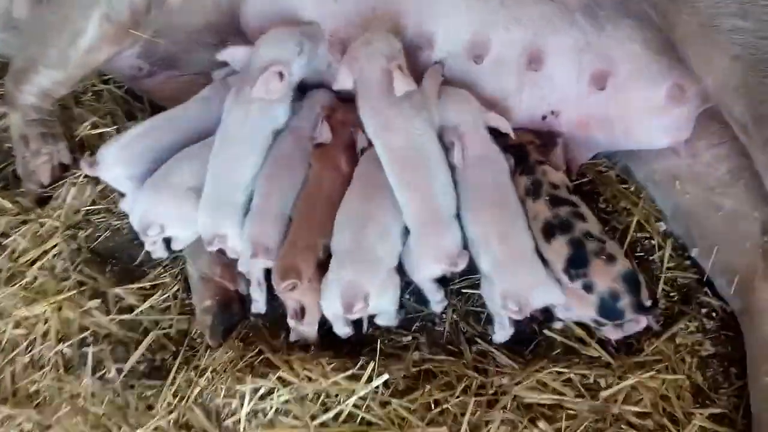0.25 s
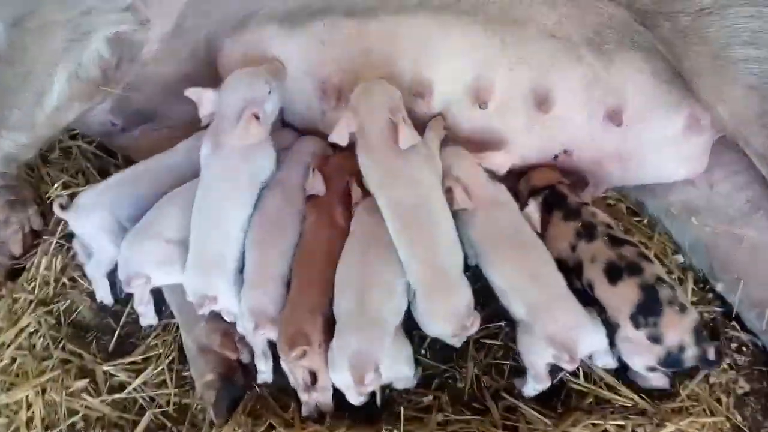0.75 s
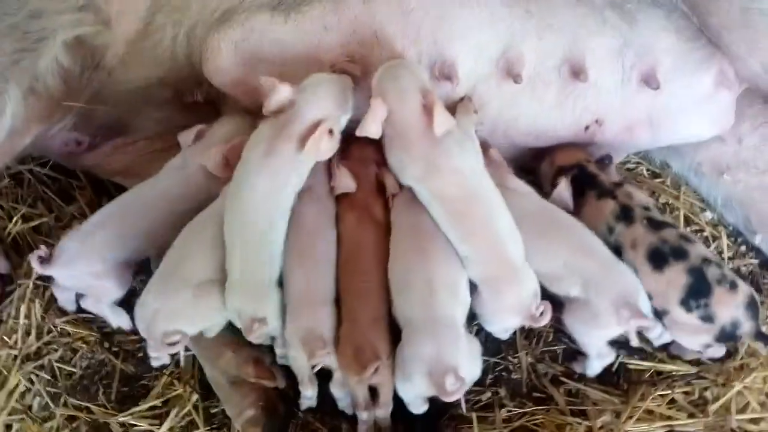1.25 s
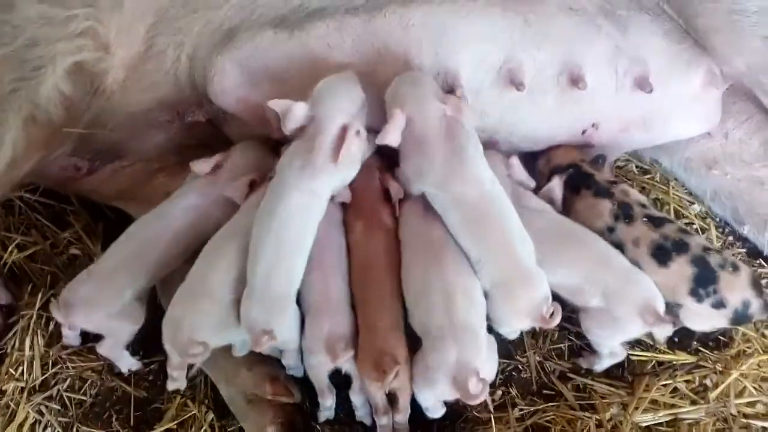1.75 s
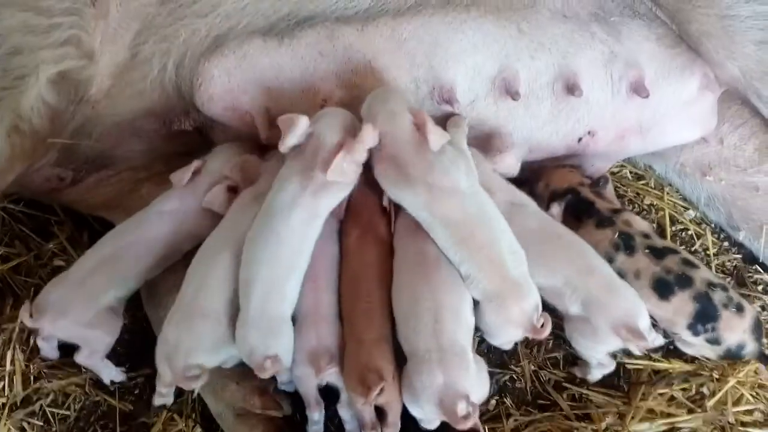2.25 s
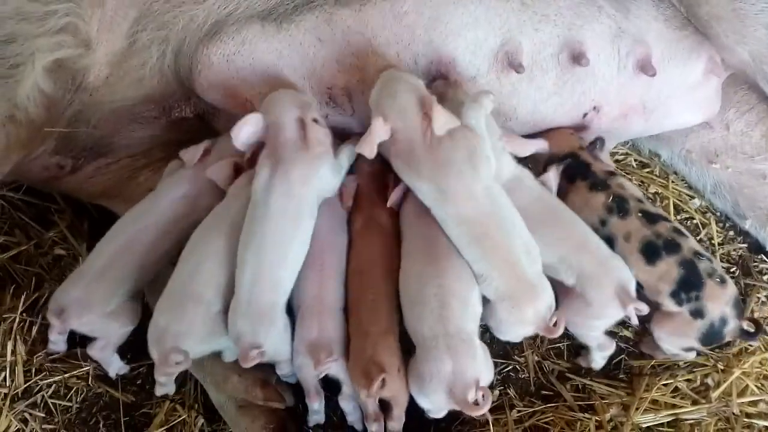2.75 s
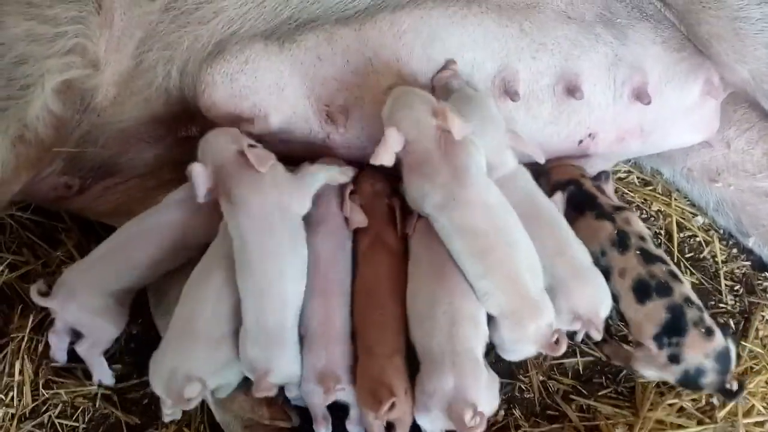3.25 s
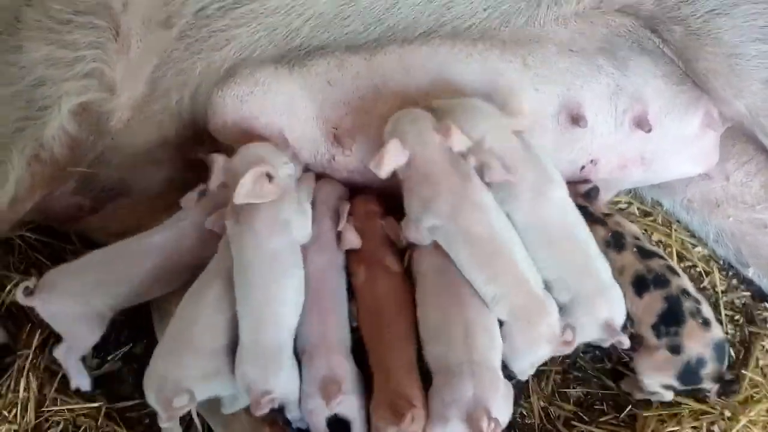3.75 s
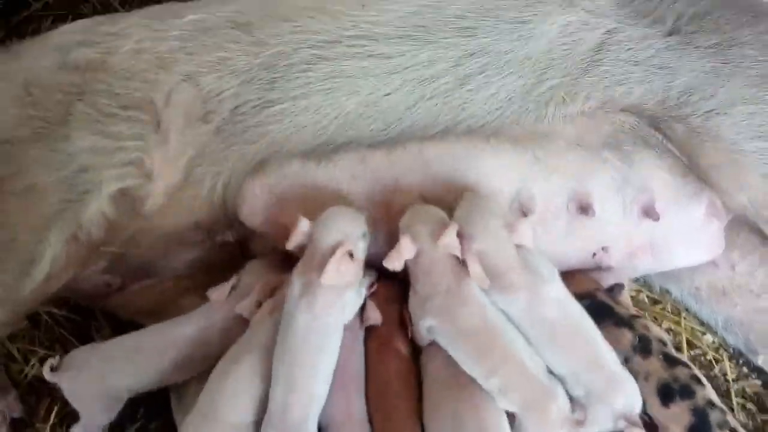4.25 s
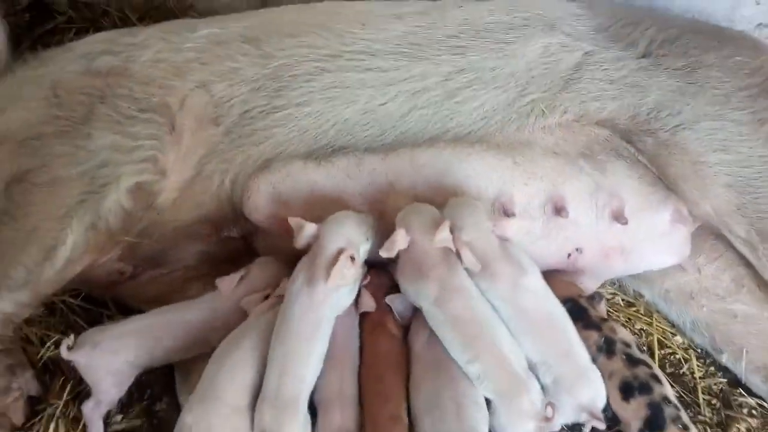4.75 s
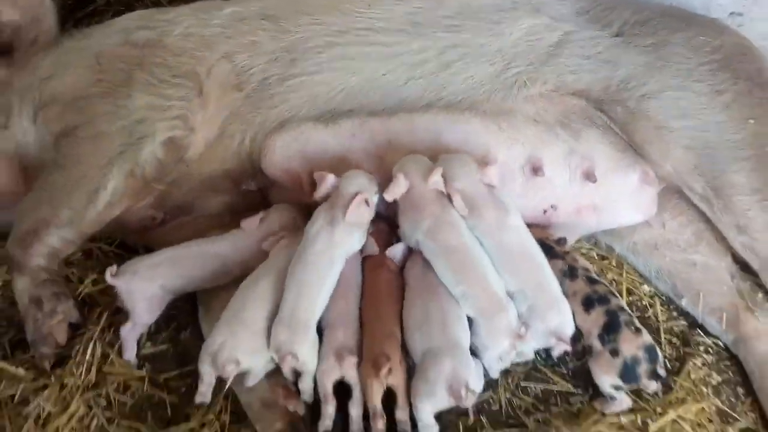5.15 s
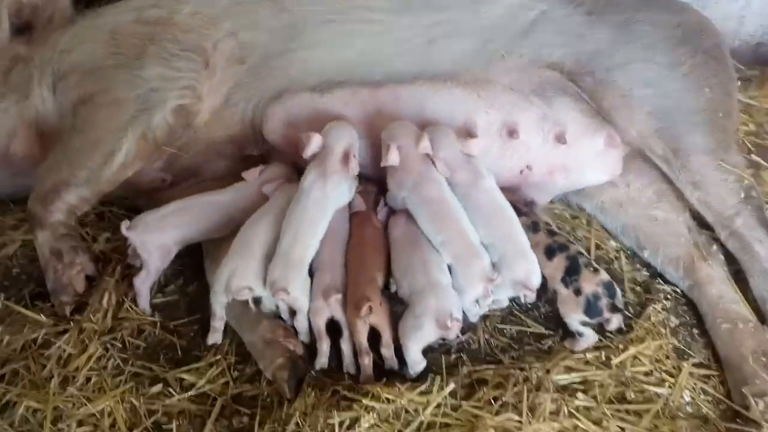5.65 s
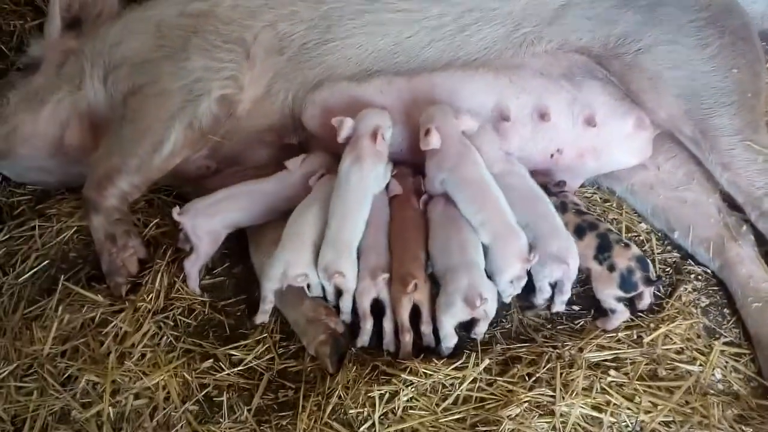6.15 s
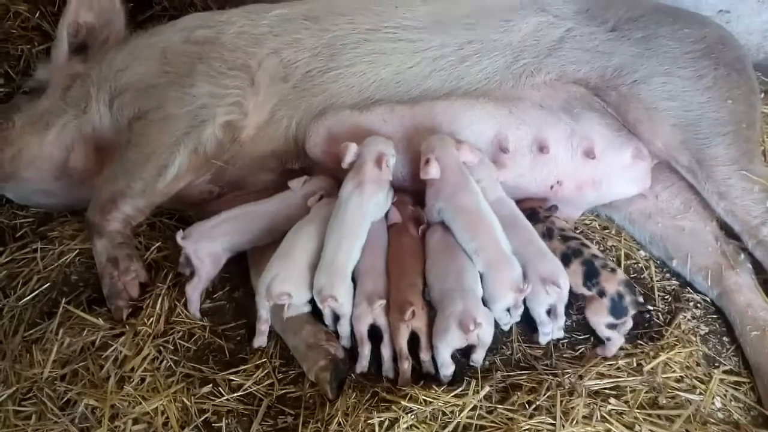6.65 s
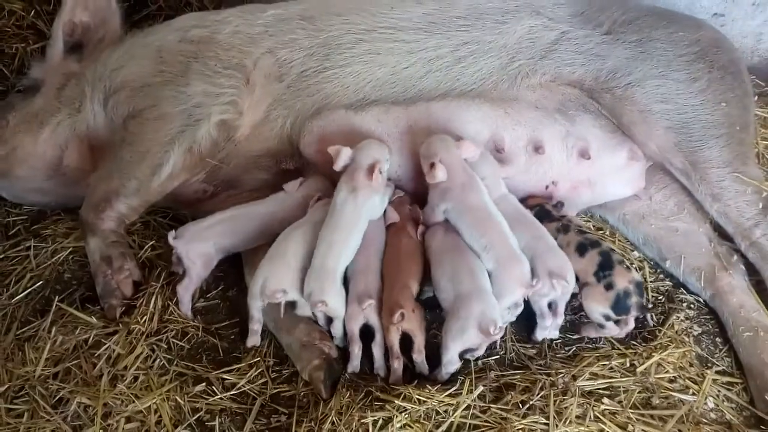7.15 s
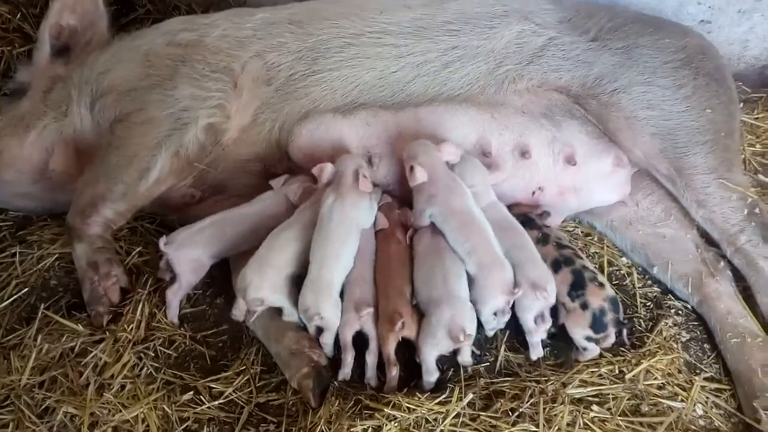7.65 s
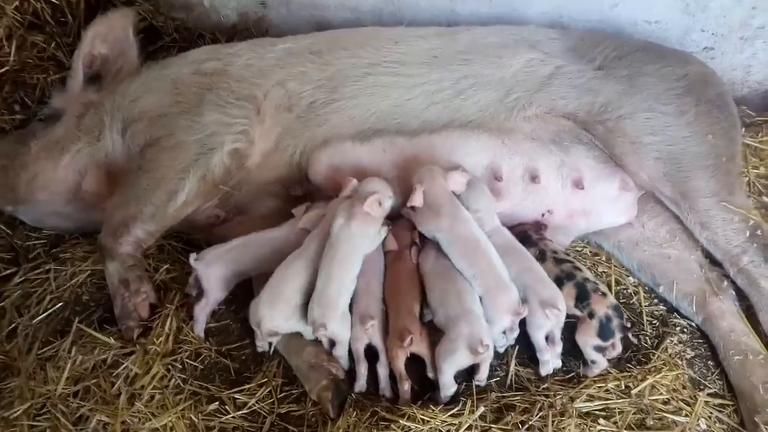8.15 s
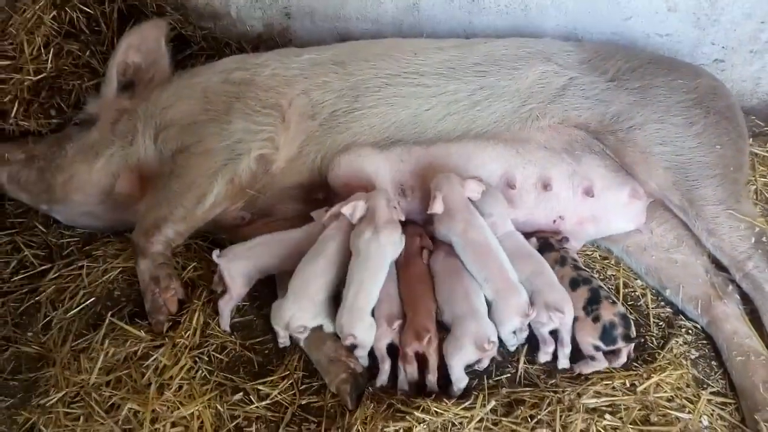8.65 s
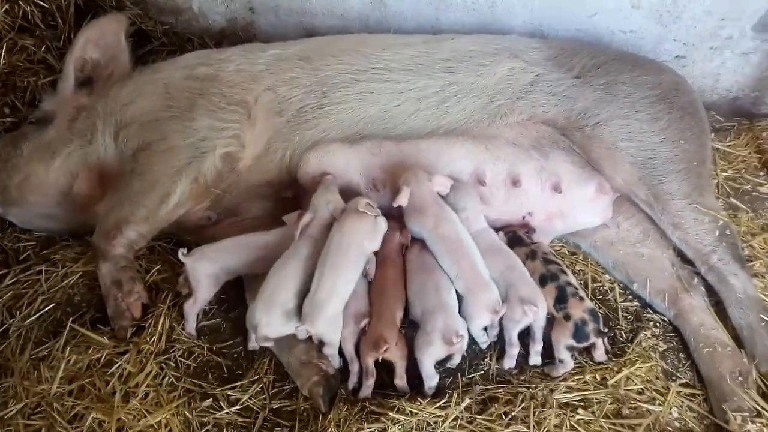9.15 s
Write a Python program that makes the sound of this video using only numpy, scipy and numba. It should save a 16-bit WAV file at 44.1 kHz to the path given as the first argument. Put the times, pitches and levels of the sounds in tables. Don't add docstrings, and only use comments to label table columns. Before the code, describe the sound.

Beside a sow nursing in straw, a close handheld microphone picks up deep, rattling, nasal grunts, each beginning as a dull murmur and opening brighter. They come irregularly at first, pause briefly, then settle into an even rhythm to the end. Between them are muffled gulps, tiny wet clicks, breathy piglet snuffles, little snorts and dry straw rustle, with a short hard room ring and low boom.

```python
import sys
import numpy as np
from scipy import signal
from scipy.fft import rfft, irfft, next_fast_len
from scipy.io import wavfile
from scipy.ndimage import uniform_filter1d
from numba import njit

SR = 44100
rng = np.random.default_rng(int(sys.argv[2]) if len(sys.argv) > 2 else 0)


def elevation(decibels):
    levels = np.asarray(decibels, float)
    return 10 ** (levels / 20)


def materialize(psi):
    bounded = np.clip(np.atleast_2d(psi).T, -1, 1)
    quanta = np.round(bounded * 32767).astype(np.int16)
    wavfile.write(sys.argv[1], SR, quanta)


N = 414128

# (time [s], pitch [Hz], level [dB], overtone level [dB])
WHINE = [
    (0.0, 2570, -47.5, -48.5),
    (0.027, 2603, -50, -59.5),
    (0.31, 2770, -77, -83),
    (0.34, 2610, -75, -92),
]
# (peak time [s], fade
# [s], snuffle level [dB], straw level [dB])
SWELLS = [(0.13, 0.16, -50.5, -70), (0.48, 0.22, -62, -78), (0.65, 0.35, -64, -98),
          (1.072, .15, -47, -58), (1.332, 0.17, -51, -84), (1.96, 0.12, -56.5, -91),
          (2.27, 0.19, -58, -76), (2.722, 0.19, -48.5, -69), (3.062, 0.13, -52, -81),
          (3.882, 0.13, -42, -74), (4.08, 0.11, -56, -71.5), (4.45, 0.27, -55, -77),
          (4.918, 0.14, -42.5, -60.5), (5.181, 0.053, -58, -62.5), (5.309, 0.12, -47.5, -111),
          (5.582, 0.09, -59, -75.5), (5.78, 0.064, -52.5, -94), (6.01, 0.098, -59, -72),
          (6.23, 0.076, -49, -69.5), (6.489, 0.072, -59.5, -71), (7.109, 0.09, -74, -96),
          (7.56, 0.16, -52.5, -97), (8.1, 0.088, -49, -108.5), (8.6, 0.13, -47, -78),
          (9.08, 0.15, -47, -87)]
# (time [s], fade [s], snuffle level [dB], straw level [dB])
JERKS = [
    (0.854, 0.062, -54, -91),
    (0.995, 0.048, -81, -96),
    (1.545, 0.33, -44, -67.5),
    (2.52, 0.035, -52, -90),
    (3.424, .2, -42.5, -57),
    (7.318, 0.12, -59.5, -63.5),
    (7.733, 0.11, -51.5, -77),
    (8.88, 0.22, -52.5, -62),
    (9.3, 0.12, -56.5, -89.5),
]
# (frequency [Hz], level per Hz [dB])
SNUFFLE_COLOUR = [(1470, 5.5), (2500, -2.5), (3250, 1.5), (4370, 7), (4810, 2), (5070, 7), (6700, 0),
                  (9000, -19.5), (11700, -44), (19800, -120)]
# (frequency [Hz], level per Hz [dB])
STRAW_COLOUR = [(4120, -29.5), (7000, -4.5), (10100, -9), (11100, -13.5), (13700, -23), (14900, -14.5),
                (15600, -33)]
STIR_DB, SWELL_SHARE, JERK_S = 25.5, 0.9, 0.016
CALM_SNUFFLE_DB, CALM_STRAW_DB = -70, -92

# (break time [s], loudest flap time [s], effort [dB], snout level [dB], mouth level [dB])
GRUNTS = [(0.054, 0.089, -26, -36, -31.5), (0.5835, 0.6496, -27, -27, -29), (2.667, 2.739, -29, -43, -29),
          (3.317, 3.396, -22.5, -32, -27), (3.803, 3.875, -25.5, -40.5, -29.5),
          (4.274, 4.347, -27, -34.5, -27), (4.749, 4.827, -26.5, -34, -31.5),
          (5.2304, 5.3075, -26.5, -34.5, -31.5), (5.646, 5.753, -26.5, -29.5, -33),
          (6.155, 6.196, -24, -32, -36), (6.545, 6.614, -27.5, -28, -35.5), (7.055, 7.09, -23, -28.5, -34),
          (7.513, 7.546, -22.5, -35.5, -36), (7.9807, 8.0591, -24, -39, -26), (8.479, 8.516, -24, -34, -38),
          (8.93, 9.005, -24.5, -33.5, -35)]
# (first flap time [s], loudest flap time [s], hold [s], effort [dB], mouth level [dB])
RESTLESS = [
    (1.124, 1.199, 0.012, -24.5, -29),
    (1.291, 1.3704, 0.24, -35.5, -25),
    (1.788, 1.867, 0.024, -29.5, -28.5),
    (2.038, 2.115, 0.012, -30, -29.5),
]
# (time [s], throat start [Hz], tongue with mouth shut [Hz], with mouth open [Hz], sinus [dB])
POSTURE = [(0.1, 890, 1270, 1425, -6), (0.599, 890, 1300, 1310, -25), (1.2, 884, 1400, 1735, -5),
           (1.4, 846, 1400, 1740, -23), (2.1, 872, 1430, 1660, -23), (2.701, 890, 1490, 1680, -1.5),
           (3.4, 850, 1366, 1545, -2.5), (4.3, 855, 1390, 1390, -7), (5.299, 792, 1340, 1660, -3),
           (6.2, 800, 1320, 1566, -6), (6.6, 807, 1200, 1500, -10), (7.3, 744, 1180, 1410, -12),
           (8.05, 815, 1226, 1600, -4), (9.0, 752, 1220, 1390, -4)]
# (frequency [Hz], width [Hz], level [dB])
CHEST = [(203, 57.5, -0.5), (396, 100, -3.5), (469.8, 58.4, 0.5), (850, 84, -16)]
# (frequency [Hz], width [Hz], level [dB])
SNOUT = [(2400, 274, 1), (6070, 290, 0)]
# (frequency [Hz], width [Hz], level [dB])
MOUTH = [(2710, 170, 0.5), (3465, 530, 1.5), (4150, 190, -4), (5780, 140, -12.5)]
# (frequency [Hz], width [Hz], level [dB])
SINUS = [(4486, 245, 6.5)]
FLAP_S = .037
MURMUR_FLAPS = 3
MURMUR_DB, MURMUR_DULL_DB, RESTLESS_FIRST_DB = 19, 13.5, 7.5
MURMUR_END_DB, BREAK_DB_PER_S = 1.5, 73.5
MURMUR_THROAT_DB, MURMUR_PITCH = 3, .7
RELEASE_S, RELEASE_DB, CLOSE_S = .1, 27, 0.028
THROAT_DB, THROAT_FIRST_DB, THROAT_END_DB = -10, -13.5, -11.5
SNOUT_FIRST_DB, SNOUT_END_DB, RESTLESS_SNOUT_DB = -1, -1.5, -40.5
MOUTH_SHUT_DB, MOUTH_END_DB, RESTLESS_TONGUE_DB = -10.5, -1.5, -2
JAW_LEAD_S, TONGUE_START = 0.0032, 0.893
REST_HZ = 891.8

# (frequency [Hz], width [Hz], level [dB])
BOOM = [(68.2, 5.3, 7.5), (116.87, 3.52, -2)]
# (time [s], first mode [dB], second mode [dB])
PLACE = [(0, 7, 15), (2, 3, 6), (4, 4, 13.5), (5.5, 3.5, 8), (6.5, -5, 6.5), (8, 1, 13.5), (9.4, -8, 9.5)]
# (frequency [Hz], width [Hz], level [dB])
PEN = [(226, 50, -1.5), (234.7, 8.9, 15.5), (312, 3.4, -36), (478, 2.6, -14.5), (908, 6.3, -7)]
# (frequency [Hz], time to fall 60 dB [s])
WALLS = [(60, 1), (250, 0.43), (700, 0.47), (1500, 0.36), (4000, 0.35), (8000, 0.059)]
# (frequency [Hz], left-right likeness [-1 to 1])
ALIKE = [(60, .97), (130, .995), (290, .95), (640, .65), (1100, -.2), (2000, 0), (15000, 0)]
LAG = 16
LAG_FROM_HZ = 830

# (time [s], peak level [dB])
GULPS = [(0.471, -39.5), (1.039, -40.5), (2.551, -40), (3.219, -40.5), (3.705, -38), (4.175, -39.5),
         (4.656, -41), (5.114, -39.5), (5.56, -40.5), (5.939, -39.5), (6.438, -36.5), (6.925, -37),
         (7.355, -38), (7.884, -38.5), (8.333, -39), (8.849, -37), (9.326, -35)]
# (time [s], peak level [dB], pitch [Hz])
SMACKS = [
    (0.847, -52, 4280),
    (2.5164, -63, 4400),
    (3.0095, -53, 1630),
    (4.0154, -58, 1290),
    (4.696, -61, 2920),
    (5.0792, -54.5, 1190),
    (7.314, -62.5, 3800),
    (7.7285, -53.5, 1340),
]
# (time [s], level [dB], length [s], brightness [dB])
SNORTS = [
    (1.007, -55.5, 0.02, 3.5),
    (7.799, -62, 0.15, 0.5),
    (2.999, -44.5, 0.11, -3),
    (5.511, -49, 0.057, -13),
    (5.93, -46.5, 0.086, -12),
    (6.825, -53, 0.052, -36),
]
# (frequency [Hz], width [Hz], level [dB])
PIGLET = [(583, 370, 1.5), (890, 630, -10)]
# (frequency [Hz], width [Hz], level [dB])
NOSTRIL = [(997, 130, -0.5), (1480, 350, -1), (1780, 290, -2.5)]
# (time [s], level [dB], length [s])
NOSE = [
    (9.315, -66, 0.038),
    (6.922, -79, 0.16),
    (7.947, -68.5, 0.019),
    (8.842, -68.5, 0.11),
]

# (frequency [Hz], level per Hz [dB])
AIR = [(48, -26), (66, 0), (120, 4), (250, 6.5), (600, -6.5), (1000, -9.5), (1400, -8.5), (1900, -14.5),
       (3000, -19.5), (5000, -21), (6800, -31), (8000, -38.5), (15600, -53)]
AIR_DB = -53.5
LULL_S, LULL_WIDTH_S, LULL_DB = 2.597, 0.27, -14.5
# (frequency [Hz], level per Hz [dB])
HANDS = [(26, -4), (36, -2.5), (46, -24.5), (80, -69)]
# (frequency [Hz], left minus right [dB])
TILT = [(60, -3.5), (110, -3.5), (200, -1), (380, -3.5), (700, -1.5), (1290, -3), (2380, -6.5), (4400, 0.5),
        (8120, 2), (15000, -6)]
TOP_HZ = 15650


def unit(x):
    return x / np.sqrt(np.mean(x ** 2) + 1e-20)


def along(points, hz):
    f, v = np.transpose(points)
    return np.interp(np.log(hz + 1), np.log(f + 1), v)


def curves(rows):
    s, *cols = np.transpose(rows)
    return [np.interp(np.arange(N) / SR, s, c) for c in cols]


def filtered(x, response):
    m = next_fast_len(x.shape[-1] + SR // 2)
    spectrum = rfft(x, m) * response(np.fft.rfftfreq(m, 1 / SR))
    return irfft(spectrum, m)[..., :x.shape[-1]]


def ringing(modes):
    def response(f):
        total = 0
        for k, (centre, width, db) in enumerate(modes):
            resonance = 1j * f * width / (centre * centre - f * f + 1j * f * width)
            total = total + (-1) ** k * elevation(db) * resonance
        return total
    return response


def paired(two):
    def mix(hz):
        turn = np.arccos(np.clip(along(ALIKE, hz), -1, 1)) / 2
        return np.array([np.cos(turn), np.sin(turn)])
    mid, side = filtered(two, mix)
    return np.array([mid + side, mid - side])


def rush(spectrum, patchy_db):
    z = signal.stft(rng.standard_normal((2, N)), nperseg=256)[2]
    field = uniform_filter1d(rng.standard_normal(z.shape[1:]), size=5, axis=0)
    field = uniform_filter1d(field, size=8, axis=1)
    two = signal.istft(z * elevation(patchy_db * unit(field)), nperseg=256)[1][:, :N]
    return unit(filtered(paired(two), lambda hz: elevation(along(spectrum, hz))))


def whine():
    last_s, last_hz = WHINE[-1][:2]
    hz, db, over_db = curves(WHINE + [(last_s + .03, last_hz, -110, -110)])
    wobble_hz = 1100 * uniform_filter1d(rng.standard_normal(N), size=200)
    turn = 2 * np.pi * np.cumsum(hz + wobble_hz) / SR
    return np.sqrt(2) * (elevation(db) * np.sin(turn) + elevation(over_db) * np.sin(2 * turn))


def litter():
    t = np.arange(0, N + 64, 64) / SR
    s, fade, snuffle_db, straw_db = np.transpose(SWELLS + JERKS)[..., None]
    swells = np.arange(len(s))[:, None] < len(SWELLS)
    rise = np.where(swells, SWELL_SHARE * fade, JERK_S)
    loss_db = STIR_DB * np.maximum((s - t) / rise, (t - s) / fade)

    def level(db, calm_db):
        return np.interp(np.arange(N) / SR, t, elevation(db - loss_db).sum(0) + elevation(calm_db))

    snuffle = level(snuffle_db + 1, CALM_SNUFFLE_DB) * rush(SNUFFLE_COLOUR, patchy_db=2.0)
    return snuffle + level(straw_db, CALM_STRAW_DB) * rush(STRAW_COLOUR, patchy_db=3.5)


def gap(first, peak):
    return (peak - first) / round((peak - first) / FLAP_S)


def grunts():
    rows = []
    for out, peak, db, snout, mouth in GRUNTS:
        step = gap(out, peak)
        first = min(peak - MURMUR_FLAPS * step, out - step)
        rows.append((first, out, peak, 0, db, snout, mouth, 0))
    for first, peak, hold, db, mouth in RESTLESS:
        rows.append((first, first, peak, hold, db, RESTLESS_SNOUT_DB, mouth, 1))
    rows.sort()
    ends = [row[0] for row in rows[1:]] + [N / SR]
    return [(*row, end) for row, end in zip(rows, ends)]


def flaps(jitter=0.00098, scatter_db=2):
    x = np.zeros(N)
    for s, _, peak, *_, end in grunts():
        chance = rng.standard_normal((24, 2))
        times = s + gap(s, peak) * np.arange(24) + jitter * chance[:, 0]
        keep = (times < end - FLAP_S / 2) & (times > 0)
        x[(times[keep] * SR).astype(int)] = elevation(scatter_db * chance[keep, 1])
    return x


def strengths():
    effort, colour = [], []
    for s, out, peak, hold, db, snout, mouth, agape, end in grunts():
        shut = mouth + (1 - agape) * MOUTH_SHUT_DB
        done, drop = peak + hold + RELEASE_S, peak - JAW_LEAD_S
        first = np.array([THROAT_FIRST_DB, snout + SNOUT_FIRST_DB, shut])
        dull = first - [MURMUR_THROAT_DB, MURMUR_DULL_DB, MURMUR_DULL_DB]
        murmur = [] if agape else [(s - .004, db - MURMUR_DB), (out - .008, db - MURMUR_END_DB)]
        under_db = RESTLESS_FIRST_DB if agape else BREAK_DB_PER_S * (peak - out)
        push = [(s - .012, -90), *murmur, (out - .004, db - under_db), (peak, db), (peak + hold, db),
                (done, db - RELEASE_DB), (done + CLOSE_S, -90)]
        tone = [(s - .012, *dull), (out - .008, *dull), (out - .004, *first),
                (drop - .004, THROAT_DB, snout, shut), (drop, THROAT_DB, snout, mouth),
                (peak + hold, THROAT_DB, snout, mouth),
                (done, THROAT_END_DB, snout + SNOUT_END_DB, mouth + MOUTH_END_DB)]
        effort += [row for row in push if row[0] < end - .013]
        colour += [row for row in tone if row[0] < end - .013]
    return curves(effort) + curves(colour)


def tract():
    when, *lies = np.transpose(POSTURE)
    rows = []
    for s, out, peak, *_, agape, end in grunts():
        hz, shut, wide, sinus = [np.interp(peak, when, c) for c in lies]
        over, drop = 1.6 * REST_HZ - .6 * hz, peak - JAW_LEAD_S
        trims = (agape * RESTLESS_TONGUE_DB, sinus)
        start, before = (wide, wide) if agape else (TONGUE_START * shut, shut)
        if not agape:
            rows.append((s, MURMUR_PITCH * hz, MURMUR_PITCH * shut, 0, *trims))
        rows += [(out, hz, start, agape, *trims), (drop - .014, over, before, agape, *trims),
                 (drop + .012, over, wide, 1, *trims), (peak + .07, over, wide, 1, *trims)]
    return curves(rows)


@njit
def gliding(x, turn, fade):
    y = np.zeros(len(x))
    for i in range(2, len(x)):
        drive = 2 * (1 - fade) * np.sin(turn[i]) * x[i]
        y[i] = drive + 2 * fade * np.cos(turn[i]) * y[i - 1] - fade * fade * y[i - 2]
    return y


def formant(x, hz, width_hz):
    turn, fade = 2 * np.pi * hz / SR, np.exp(-np.pi * width_hz / SR)
    return gliding(gliding(x, turn, fade), turn, fade)


def sow():
    effort_db, throat_db, snout_db, mouth_db = strengths()
    throat_hz, tongue_hz, jaw, trim_db, sinus_db = tract()
    effort = elevation(effort_db)
    snaps = flaps() * effort
    t = np.arange(SR // 10) / SR

    def puffs(t60, leak):
        puff = elevation(-60 * t / t60) * (1 - np.exp(-t * 500))
        flow = signal.fftconvolve(snaps, puff)[:N] + leak * effort
        return flow * rng.standard_normal(N)

    def through(level_db, modes):
        return filtered(elevation(level_db) * high, lambda f: ringing(modes)(f) ** 2)

    low = snaps * 34 + puffs(.1, 0.09) * 1.2 + gulps()
    voice = filtered(low, lambda f: ringing(CHEST)(f) / (1 + 1j * f / 700) ** 2) * elevation(21.5)
    high = snaps * 20 + puffs(.04, .032) * 2.1
    voice += formant(elevation(throat_db + 25.5) * high, throat_hz, width_hz=99)
    tongue_db = trim_db + (1 - jaw) * (throat_db + 23.0) + jaw * (0.3 * mouth_db + 16.0)
    voice += formant(elevation(tongue_db) * high, tongue_hz, width_hz=250)
    voice += formant(elevation(tongue_db - 5) * high, tongue_hz - 260, width_hz=300)
    voice += through(snout_db + 28 - 12.0 * jaw, SNOUT)
    voice += through(mouth_db + 24, MOUTH)
    voice += through(throat_db + sinus_db + 2, SINUS)
    voice += through(mouth_db + 8.5, [(3400, 2200, 0)])

    def soft(f):
        return (1j * f / (85 + 1j * f)) ** 3 / (1 + 1j * f / 7500) ** 3
    return filtered(voice, soft), low


def boom(push):
    out = np.zeros(N)
    for mode, db in zip(BOOM, curves(PLACE)):
        broad = (mode[0], 60, 0)
        out += elevation(db + 24.5) * filtered(push, lambda f: ringing([mode])(f) * ringing([broad])(f))
    return out


def walls(x, piece=SR * 2 // 3):
    out = np.zeros((2, N + 2 * SR))
    for i in range(0, N, piece):
        hz, t, z = signal.stft(rng.standard_normal((2, SR * 3 // 5)), SR, nperseg=512)
        fading = z * elevation(-60 * t / along(WALLS, hz)[:, None])
        tail = paired(signal.istft(fading, SR, nperseg=512)[1])
        wet = signal.fftconvolve(x[None, i:i + piece], tail / np.linalg.norm(tail[0]), axes=1)
        out[:, i + 250:][:, :wet.shape[1]] += wet
    return out[:, :N]


def gulps():
    x, t = np.zeros(N + SR), np.arange(SR // 10) / SR
    for s, db in GULPS:
        start = round(s * SR)
        x[start:][:60] += elevation(db) * np.hanning(60)
        x[start:][:len(t)] += elevation(db - 12 - 60 * t / 0.39) * rng.standard_normal(len(t))
    return x[:N]


def smacks():
    x, t = np.zeros(N + SR), np.arange(SR // 40) / SR
    for s, db, hz in SMACKS:
        wet = .5 * rng.standard_normal(len(t)) * elevation(-60 * t / 0.0055)
        click = np.sin(2 * np.pi * hz * t) + wet
        x[round(s * SR):][:len(t)] += elevation(db + 14.5 - 60 * t / 0.019) * click
    return filtered(x[:N], lambda f: 1 / (1 + 1j * f / 6000) ** 3)


def snorts():
    dull, bright = np.zeros((2, N + SR))
    for s, db, length, bright_db in SNORTS:
        t = np.arange(round(length * SR)) / SR
        flutter = 1 + .5 * np.sin(2 * np.pi * 55 * t)
        shape = np.sin(np.pi * (t / length) ** 0.64) * flutter
        air = elevation(db + 19.5) * shape * rng.standard_normal(len(t))
        dull[round(s * SR):][:len(t)] = air
        bright[round(s * SR):][:len(t)] = elevation(bright_db) * air
    throat = filtered(dull[:N], lambda f: ringing(PIGLET)(f) ** 2)
    return throat + filtered(bright[:N], lambda f: ringing(NOSTRIL)(f) ** 2)


def nose():
    air = np.zeros(N)
    for s, db, length in NOSE:
        t = np.arange(round(length * SR)) / SR
        flutter = 1 + 0.78 * np.cos(2 * np.pi * t / FLAP_S)
        air[round(s * SR):][:len(t)] = elevation(db + 16.5) * flutter * rng.standard_normal(len(t))
    return filtered(air, lambda f: ringing(SNOUT[:1] + SINUS)(f) ** 2)


def scene():
    voice, push = sow()
    voice = voice + nose()
    direct = elevation(-3) * voice + elevation(2.5) * filtered(voice, ringing(PEN)) + boom(push)
    direct = filtered(direct, lambda hz: (1j * hz / (58 + 1j * hz)) ** 4)

    def later(f):
        return np.exp(-2j * np.pi * f * LAG / SR / (1 + (LAG_FROM_HZ / (f + 1)) ** 3))

    ports = np.array([filtered(direct, later), direct])
    near = smacks() + whine()
    piglet = snorts()
    loudness = np.sqrt(np.abs(uniform_filter1d(direct ** 2, size=2600)))
    duck = (1 + loudness / elevation(-32)) ** -.8
    lull_db = LULL_DB * np.exp(-((np.arange(N) / SR - LULL_S) / LULL_WIDTH_S) ** 2)
    air = rush(AIR, patchy_db=1.5)
    behind = litter() + elevation(AIR_DB + lull_db) * air
    echoes = elevation(-4) * walls(voice + piglet + elevation(-6) * near)
    return ports + near + piglet + echoes + duck * behind


def low_pass(x):
    return signal.sosfilt(signal.butter(12, 15720, fs=SR, output="sos"), x)


def record(dry):
    sway = elevation(-61.5) * unit(filtered(rng.standard_normal(N), lambda hz: elevation(along(HANDS, hz))))
    hiss = elevation(-81.5) * rng.standard_normal((2, N))

    def colour(hz):
        return elevation(np.array([[.5], [-.5]]) * along(TILT, hz)) * (hz < TOP_HZ)

    return low_pass(filtered(dry + sway + hiss, colour))


dry = scene()
out = record(dry)
materialize(out)
```